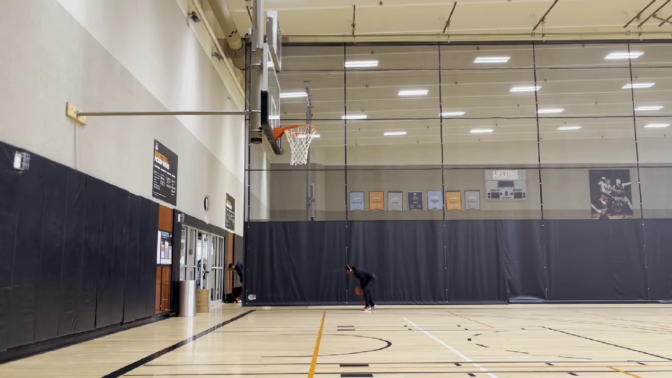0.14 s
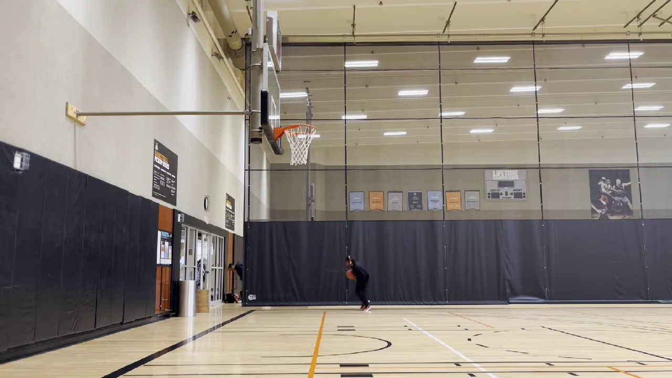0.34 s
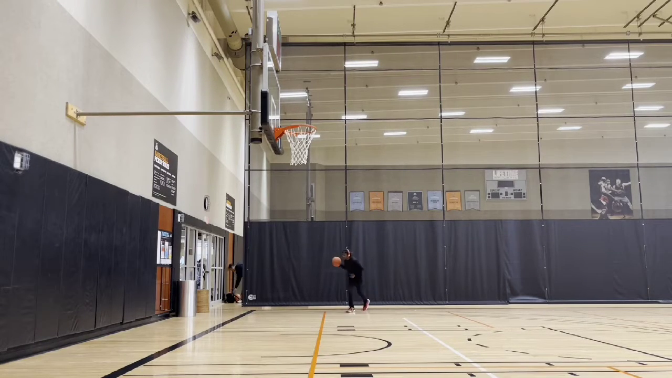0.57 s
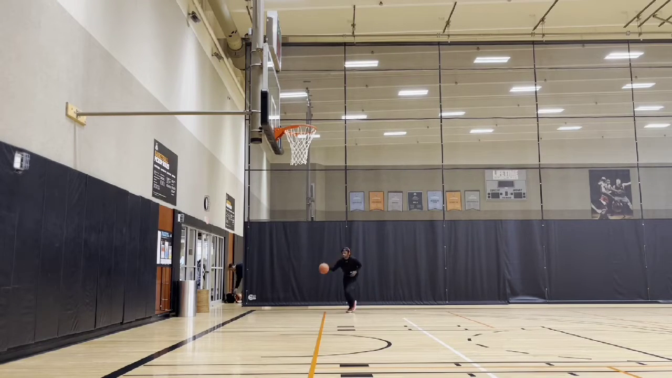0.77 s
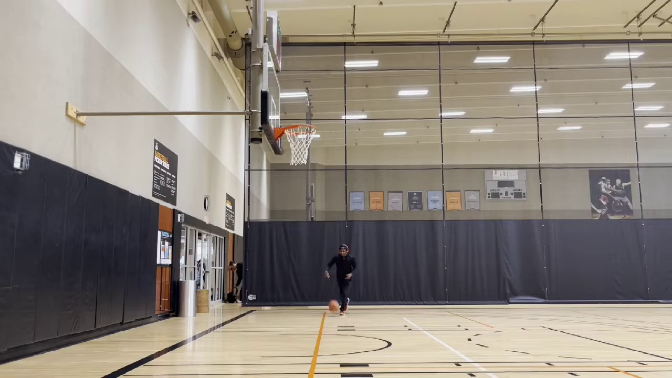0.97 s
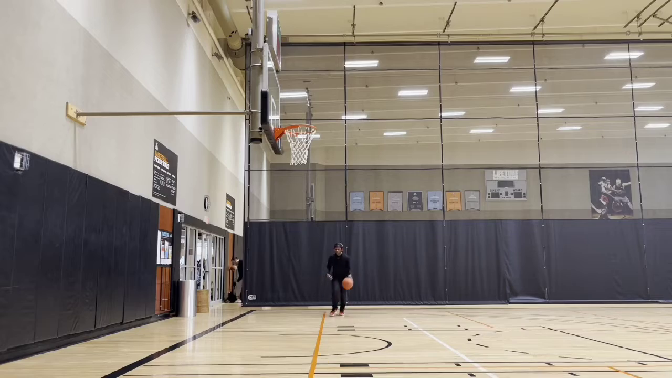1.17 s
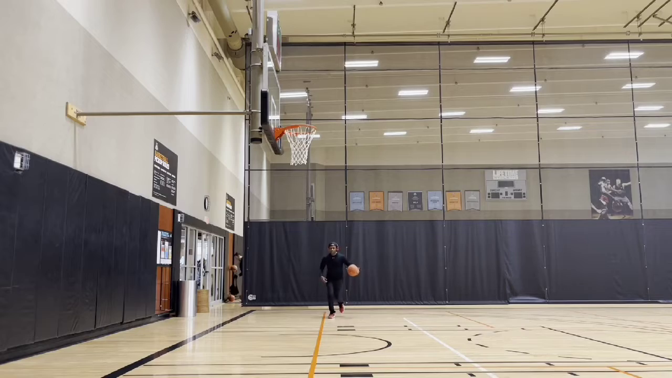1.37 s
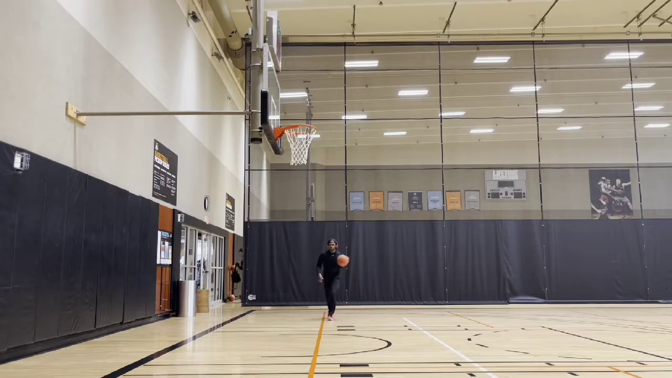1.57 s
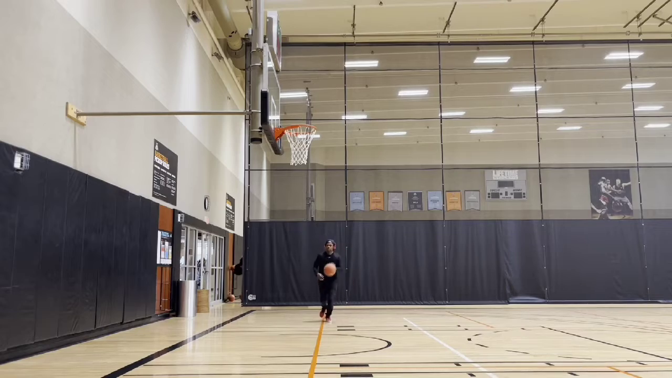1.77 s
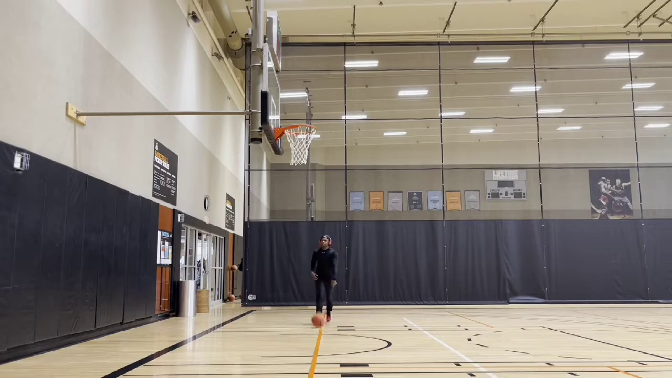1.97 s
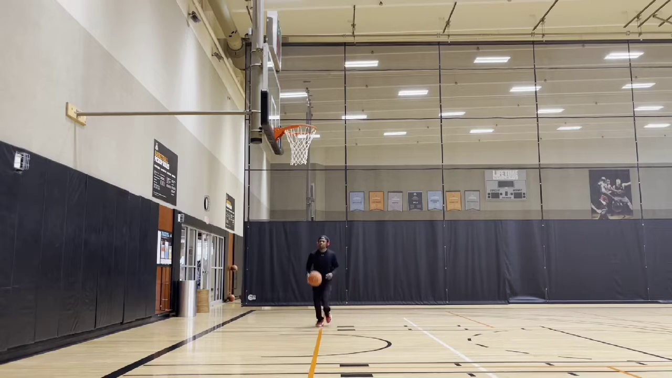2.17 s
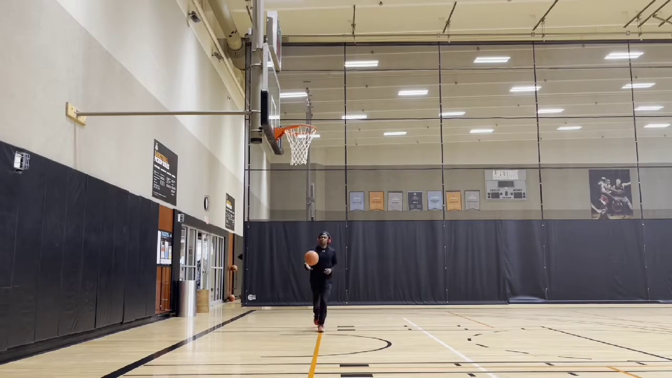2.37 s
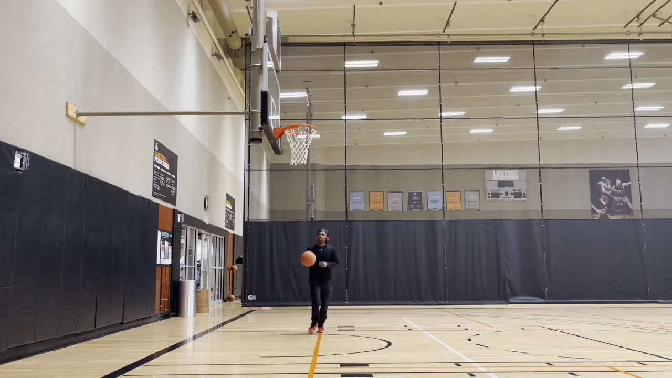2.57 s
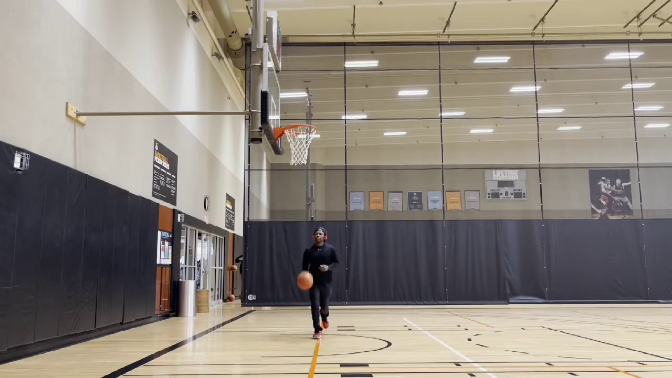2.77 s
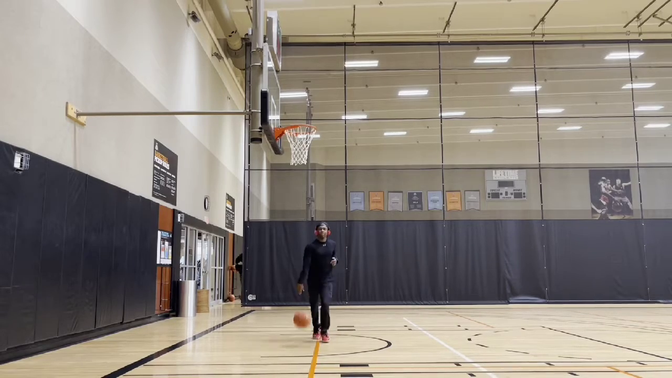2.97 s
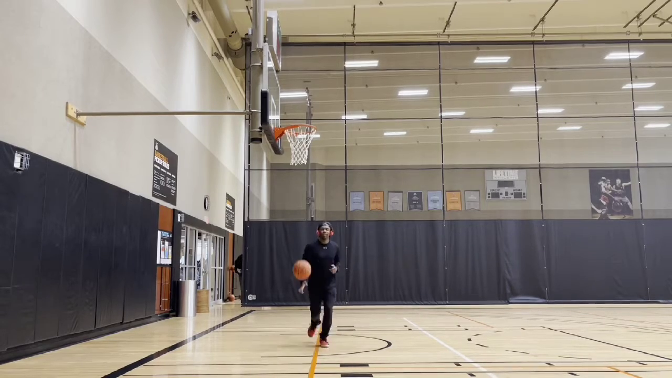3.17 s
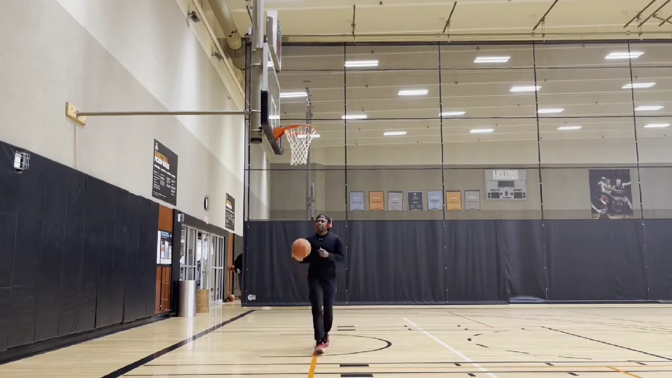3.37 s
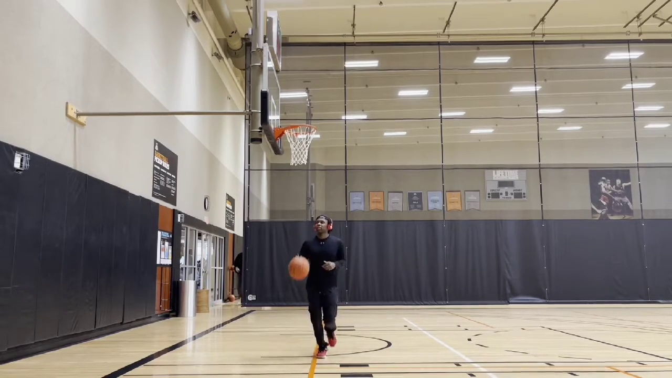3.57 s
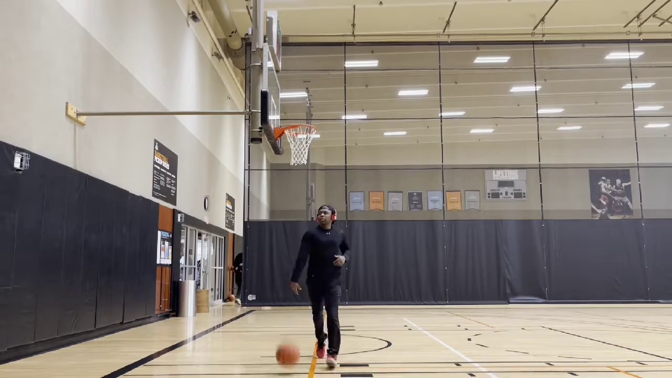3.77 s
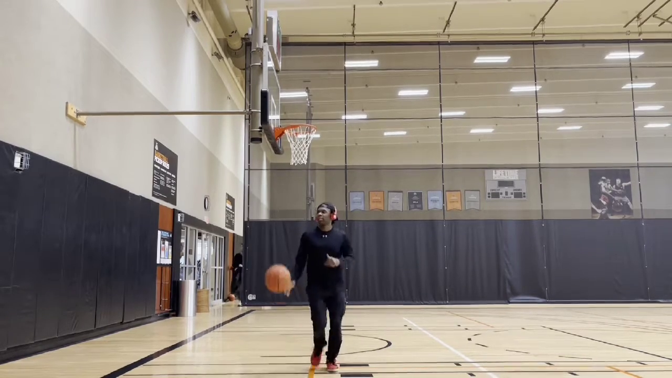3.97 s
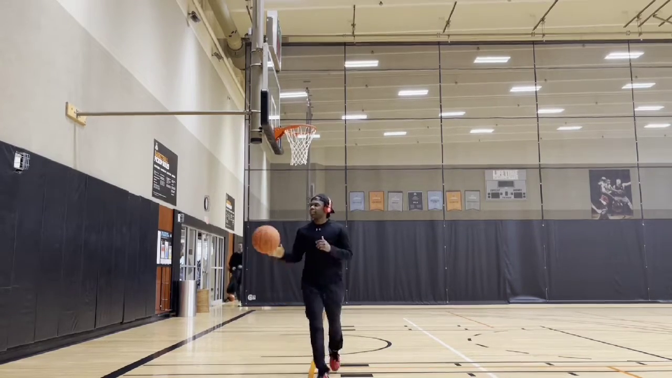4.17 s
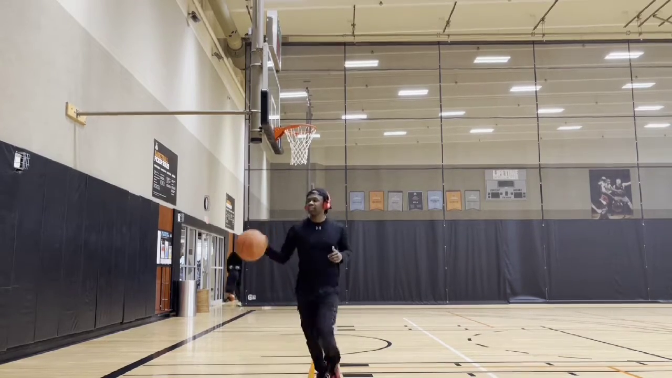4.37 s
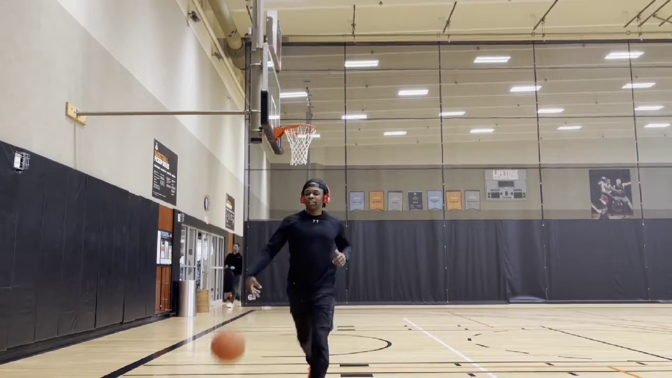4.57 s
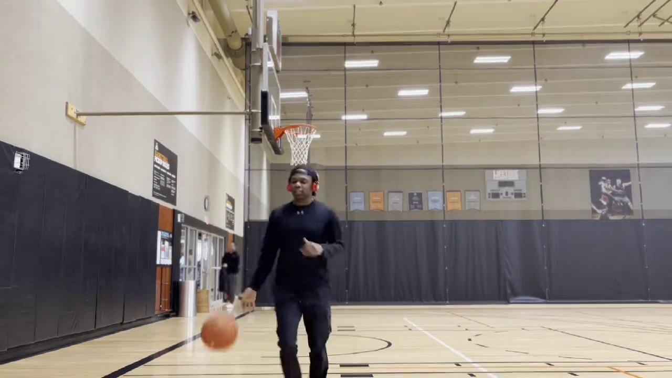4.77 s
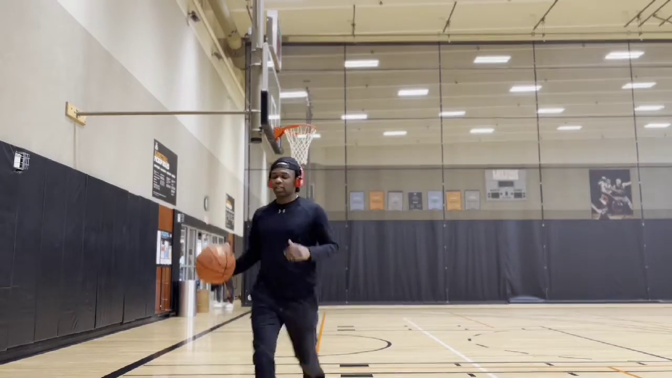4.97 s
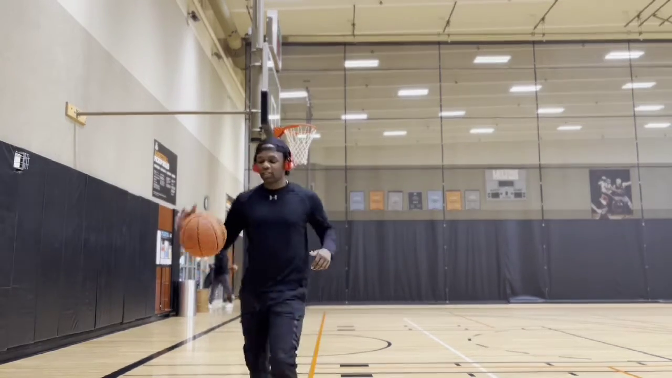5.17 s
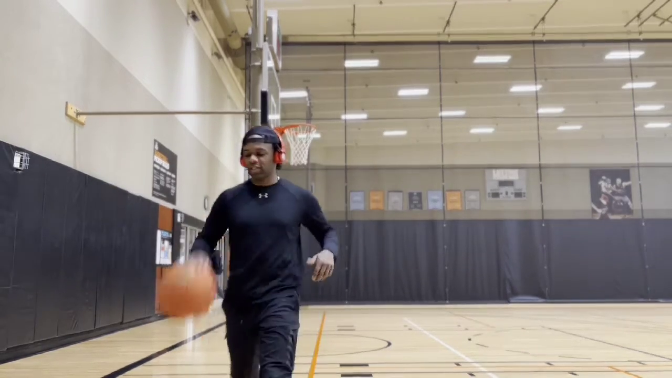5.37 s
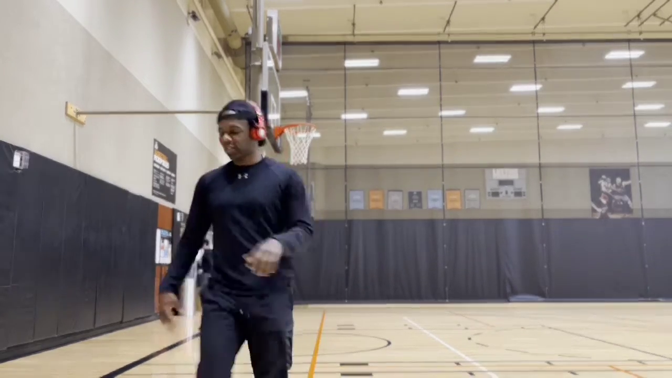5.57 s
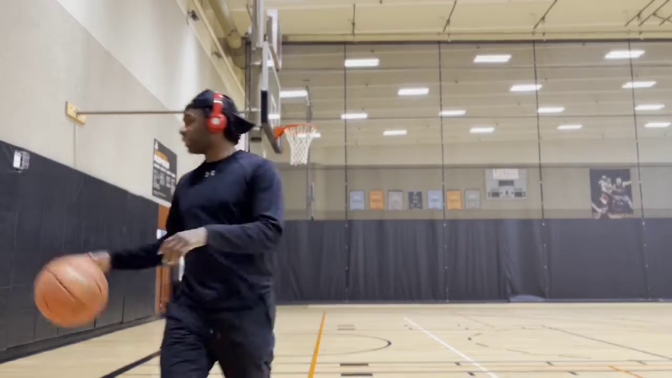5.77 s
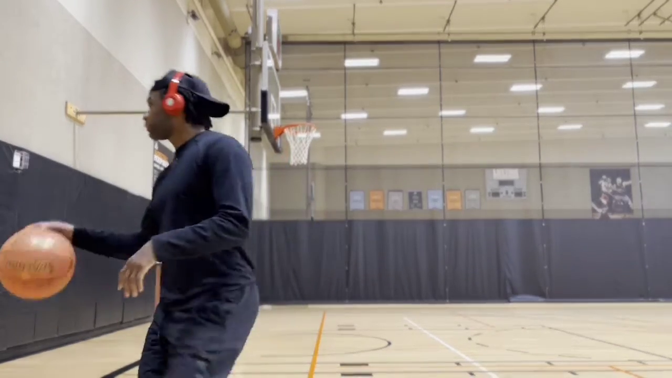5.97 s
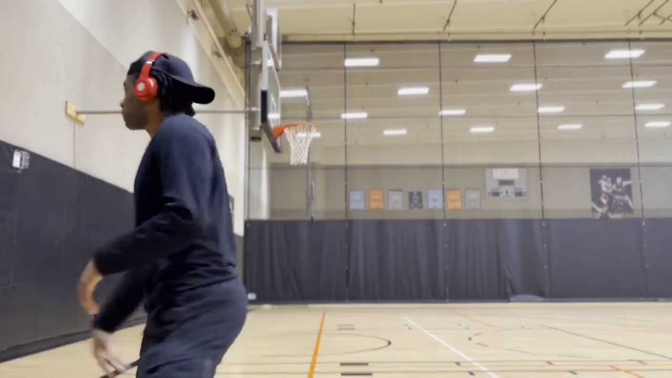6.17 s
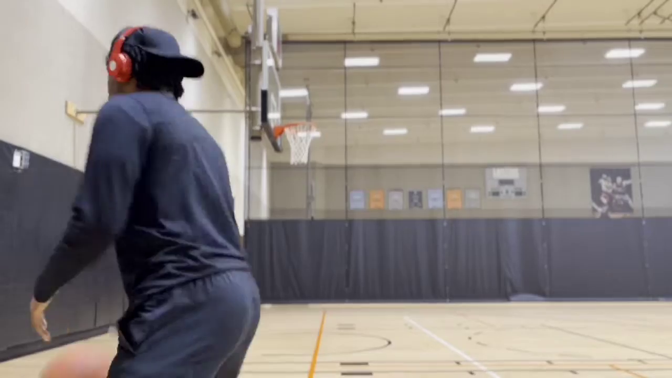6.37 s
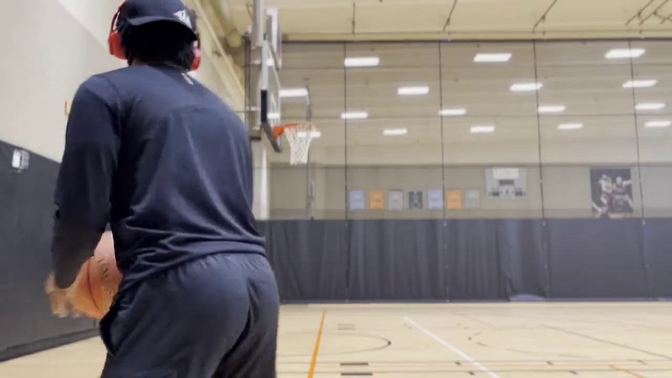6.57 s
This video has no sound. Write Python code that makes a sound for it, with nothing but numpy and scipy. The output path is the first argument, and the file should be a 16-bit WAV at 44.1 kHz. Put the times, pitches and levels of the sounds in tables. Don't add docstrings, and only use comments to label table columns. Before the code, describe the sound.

A basketball bounces slowly on a wooden gym floor, seven slapping, ringing thumps with long hall echoes, coming closer over low ventilation rumble.

```python
import sys
import numpy as np
from scipy import signal
from scipy.io import wavfile
from scipy.ndimage import uniform_filter1d

SR = 44100
rng = np.random.default_rng(int(sys.argv[2]) if len(sys.argv) > 2 else 0)


def voltage_ratio(decibels):
    exponent = np.asarray(decibels, float) / 20
    return 10 ** exponent


def store_wav(level_fs):
    pcm = np.round(np.clip(np.atleast_2d(level_fs), -1, 1) * 32767)
    wavfile.write(sys.argv[1], SR, pcm.T.astype(np.int16))


N = 292463
SHORT_N = 6000


def evened(x):
    return x / np.sqrt(np.mean(x ** 2) + 1e-20)


def peaked(x):
    return x / abs(x).max()


def smooth_noise(count, width):
    return evened(uniform_filter1d(rng.standard_normal(count), width))


def patchy(shape, hz_bins, frames):
    across = uniform_filter1d(rng.standard_normal(shape), hz_bins, 0)
    return evened(uniform_filter1d(across, frames, 1))


def read(points, hz):
    f, value = np.transpose(points)
    return np.interp(np.log(hz + 1), np.log(f + 1), value)


def add(mix, start_s, sound):
    part = mix[round(start_s * SR):][:len(sound)]
    part += sound[:len(part)]


def causal(points):
    hz = abs(np.fft.fftfreq(4096, 1 / SR))
    log_gain = np.log(voltage_ratio(np.maximum(read(points, hz), -100)))
    return np.fft.ifft(np.exp(np.conj(signal.hilbert(log_gain)))).real[:2048]


def ring(t, hz, t60_s, rise_s):
    phase = 2 * np.pi * np.cumsum(hz * np.ones(len(t))) / SR
    return -np.sin(phase) * voltage_ratio(-60 * t / t60_s) * (1 - np.exp(-t / rise_s))


def swell(hz, fall_hz, fall_s, peak_s, late_s, order):
    t = np.maximum(np.arange(SHORT_N) / SR - late_s, 0)
    turns = hz * t + fall_hz * fall_s * (1 - np.exp(-t / fall_s))
    return -np.sin(2 * np.pi * turns) * (t / peak_s * np.exp(1 - t / peak_s)) ** order


# start_s, slap_db, bright_db, ring_db, ring_hz
BOUNCES = [
    (1.1252, -20.5, -23, 0, 1550),
    (2.088, -14.5, -26.5, -6.5, 1470),
    (3.033, -10, -21.5, -6, 1200),
    (3.8641, -12.5, -28.5, -16, 1356),
    (4.7474, -7, -19, -16, 1344),
    (5.631, -12.5, -23, -10.5, 1264),
    (6.322, -10, -18.5, -7, 1613),
]
# time_s, distance_m
WALK = [
    (0, 12),
    (2.2, 12),
    (5.63, 2.9),
    (6.63, 1.9),
]
# time_s, level_db
HALL_STRENGTH = [(1.1, 1), (2.1, 3), (3.0, 4), (3.9, 3), (4.7, 1.5), (5.6, -1), (6.3, -1)]
# pitch_hz, level_db
HALL_COLOUR = [(29, -39), (50, 6), (98, 3), (203, -16.5), (291, -10.5), (371, -26), (601, -23), (783, -32),
               (1470, -29), (1660, -28), (1960, -39.5), (4670, -46), (11100, -64.5), (12900, -83),
               (16000, -59)]
ROOF = (0.06, -.00105, -22.5, -38, .8, -40.5)
FAR_WALL = (0.4, 0.1, -40, -29.5, -0.87, -55)


def dribble():
    out = np.zeros(N)
    for start_s, slap_db, bright_db, ring_db, ring_hz in BOUNCES:
        metres = np.interp(start_s, *np.transpose(WALK))
        strength_db = np.interp(start_s, *np.transpose(HALL_STRENGTH))

        body_db = 6 + 0.64 * ring_db
        skin = slap(bright_db, body_db, ring_hz, sharp=1)
        ball = voltage_ratio(ring_db - 3) * ball_air(ring_hz, rise_s=.003)
        add(out, start_s, voltage_ratio(slap_db + 2) * (skin + ball))

        boards_db = -18.5 + .38 * slap_db - 0.2247 * metres
        settle_hz = 74.4 + 5.05 * metres
        add(out, start_s, voltage_ratio(boards_db + 12.5) * boards(settle_hz))

        hz, colour_db = np.transpose(HALL_COLOUR)
        bloom_db = 4 * np.exp(-(np.log(hz / ring_hz) / .18) ** 2)
        bass_db = (1 - 0.34 * metres) * (hz < 150)
        treble_db = (4.5 - .28 * metres) * (hz > 1900)
        colour = np.transpose([hz, colour_db + bass_db + treble_db + bloom_db])
        stretch = 0.82 + 0.031 * metres
        add(out, start_s + .008, voltage_ratio(-28 + strength_db) * hall(colour, stretch, gather_s=.015))

        for surface in (ROOF, FAR_WALL):
            add(out, *echo(start_s, metres, *surface))
    return out


# pitch_hz, level_db
SLAP_COLOUR = [(350, -42.5), (600, -6), (1000, -8), (1800, -11.5), (2400, -12), (4700, -7), (6250, -15),
               (10600, -18), (12600, -16), (14500, -20), (16000, -12.5)]


def slap(bright_db, body_db, ring_hz, sharp):
    t = np.arange(SHORT_N) / SR
    clumps = voltage_ratio(4 * smooth_noise(len(t), 70))
    envelope = .05 * voltage_ratio(-60 * t / .009) + .045 * clumps * voltage_ratio(-60 * t / .065)
    crackle = rng.standard_normal(len(t)) * envelope
    crackle[:34] *= .4
    crackle[[34, 100, 320, 560]] -= sharp * np.array([1, .15, .3, .22])

    hz = np.geomspace(300, 17000, 80)
    tilt_db = (bright_db + 12.5) * np.clip(np.log2(hz / 3000), 0, 1)
    tilt_db += (bright_db + 23.5) * 0.53 * np.clip(np.log2(hz / 9000), 0, 1)
    ring_db = 9 * np.exp(-(np.log(hz / ring_hz) / .25) ** 2)
    low_db = body_db * np.clip(np.log2(1600 / hz), 0, 1)
    colour = np.transpose([hz, read(SLAP_COLOUR, hz) + tilt_db + ring_db + low_db])
    return peaked(signal.fftconvolve(crackle, causal(colour))[:len(t)])


# ratio to ring centre, level_db, t60_s
BALL_MODES = [(.74, -8, .04), (.93, -4, .04), (1, 0, .045), (1.09, -4, .04), (1.28, -10, .035),
              (1.62, -12, .03)]


def ball_air(centre_hz, rise_s):
    t = np.arange(SHORT_N) / SR
    out = np.zeros(len(t))
    for ratio, level_db, t60_s in BALL_MODES:
        mode_hz = centre_hz * ratio * rng.uniform(0.99, 1.03)
        out += voltage_ratio(level_db) * ring(t, mode_hz, t60_s, rise_s)
    return out


def boards(hz):
    knock = swell(283 - .15 * hz, 8, .004, .0055, .0015, order=2)
    thump = swell(hz, 232 - hz, .43 / hz, 1.19 / hz, .0042, order=2)
    rattle = swell(483, 0, 1, 0.0054, 0.00377, order=2)
    return voltage_ratio(-2.5) * knock + thump + voltage_ratio(-16.5) * rattle


def echo(bounce_s, metres, delay_s, delay_s_per_m, ring_db, knock_db, knock_db_per_m, click_db):
    ball = voltage_ratio(ring_db - 6) * ball_air(1400, rise_s=.006)
    click = voltage_ratio(click_db + 5) * slap(-30, 3, 1400, sharp=.12)
    knock = voltage_ratio(knock_db + knock_db_per_m * metres + 1) * swell(251, 0, 1, 0.0037, 0, order=1)
    return bounce_s + delay_s + delay_s_per_m * metres, ball + click + knock


# pitch_hz, t60_s
HALL_T60 = [(60, 2.5), (150, 3.14), (400, 3.37), (1200, 4.04), (3000, 3.05), (6000, 0.9), (11000, 0.61)]


def hall(colour, stretch, gather_s):
    grid = dict(nperseg=512, noverlap=384)
    hz, t, z = signal.stft(rng.standard_normal(2 * SR), SR, **grid)
    lumps_db = patchy(z.shape, 8, 5) * (1.2 + 2.5 * np.exp(-t / .15))
    z = z * voltage_ratio(read(colour, hz)[:, None] + lumps_db)
    lumpy = signal.istft(z, SR, **grid)[1]

    hz, t, z = signal.stft(lumpy, SR, **grid)
    early_db = 5 * (hz > 230) + 5 * (abs(hz - 650) < 350)
    early_db = early_db[:, None] * np.exp(-(t / 0.041) ** 2)
    decay_db = -60 * t / (stretch * read(HALL_T60, hz)[:, None])
    tail = signal.istft(z * voltage_ratio(early_db + decay_db), SR, **grid)[1]
    t = np.arange(len(tail)) / SR
    return voltage_ratio(22) * tail * (1 - np.exp(-t / gather_s))


# start_s, level_db, pitch_hz
BOOMS = [(1.215, -31, 103), (1.33, -24, 72.7), (1.39, -22.5, 83), (2.229, -19, 102), (2.459, -19.5, 96),
         (2.646, -26.5, 152), (3.085, -23, 96.5), (3.216, -23, 91), (3.288, -24, 70.6), (3.959, -20.5, 90),
         (4.577, -23.5, 73), (4.84, -27, 84), (4.926, -22.5, 86.5), (5.834, -20, 88.8), (6.006, -26.5, 76),
         (6.38, -16, 102.4), (6.535, -17.5, 96)]


def booms():
    out = np.zeros(N)
    for start_s, level_db, pitch_hz in BOOMS:
        add(out, start_s, voltage_ratio(level_db - 3.5) * swell(pitch_hz, 28, 0.0094, 1.35 / pitch_hz, 0, order=2))
    return out


# start_s, level_db, pitch_hz
PATS = [
    (0.52, -44.5, 545),
    (0.709, -45.5, 540),
    (1.442, -36.5, 555),
]


def pats():
    out, t = np.zeros(N), np.arange(SHORT_N) / SR
    dull = causal([(300, -19), (500, -4), (1200, -5), (3000, -22), (8000, -50)])
    for start_s, level_db, pitch_hz in PATS:
        puff = signal.fftconvolve(rng.standard_normal(len(t)) * voltage_ratio(-60 * t / 0.23), dull)
        hollow = ring(t, pitch_hz, t60_s=0.067, rise_s=0.0018)
        add(out, start_s, voltage_ratio(level_db) * (hollow + 0.57 * peaked(puff)[:len(t)]))
    return out


# start_s, level_db, pitch_hz
TAPS = [(1.049, -55, 4300), (1.076, -53, 7200), (1.442, -30, 3220), (1.4475, -32, 3700),
        (1.4535, -35, 4200), (1.48, -40, 2930), (2.779, -47, 4050), (3.48, -51, 8500), (4.585, -31.5, 4540),
        (4.925, -34, 4370), (4.971, -42, 7840), (5.337, -27, 4240), (5.35, -46, 9000), (5.365, -46, 5500),
        (5.381, -39, 8500), (5.645, -30, 4900), (5.735, -43, 8900), (5.771, -35, 4500), (5.817, -44, 10500),
        (6.418, -48, 9500), (6.443, -51, 6000)]
# start_s, level_db, pitch_hz
SCUFFS = [(.381, -55, 4170), (.705, -52, 3280), (.731, -56, 3000), (.8, -58, 4750), (2.937, -55, 5160),
          (4.735, -41, 5200), (4.906, -35.5, 3480), (5.751, -35, 4120), (6.314, -48, 5600),
          (6.431, -32.5, 4300)]


def ticks():
    out, t = np.zeros(N), np.arange(SHORT_N) / SR
    for table, t60_s in ((TAPS, 0.015), (SCUFFS, 0.11)):
        for start_s, level_db, hz in table:
            colour = causal([(hz / 3, -36), (hz / 1.3, -3), (hz * 1.25, -3), (hz * 2.2, -36)])
            envelope = voltage_ratio(-60 * t / t60_s) * (1 - np.exp(-t / 0.00033))
            burst = rng.standard_normal(len(t)) * envelope
            add(out, start_s, voltage_ratio(level_db - 7) * peaked(signal.fftconvolve(burst, colour)))
    return out


# start_s, length_s, pitch_hz, level_db
SQUEAK = (4.41, .12, 4450, -66)


def squeak():
    out = np.zeros(N)
    start_s, length_s, pitch_hz, level_db = SQUEAK
    u = np.arange(round(length_s * SR))
    waver = 1 + .03 * smooth_noise(len(u), 80)
    tone = np.sin(2 * np.pi * np.cumsum(pitch_hz * waver) / SR)
    add(out, start_s, voltage_ratio(level_db) * tone * np.sin(np.pi * u / len(u)))
    return out


# pitch_hz, level_db
CLOTH_COLOUR = [(2000, -31), (4500, 1), (7000, -0.5), (10000, 1), (14500, 2.5), (16000, 1.5)]
# start_s, level_db, length_s
RUSTLES = [(.075, -77, .12), (.384, -79, .073), (1.3794, -73, .08), (2.436, -68.5, .1), (2.5294, -75, .066),
           (2.5994, -77, .08), (2.774, -68, .094), (3.134, -64.5, 0.13), (3.476, -59.5, .085),
           (4.201, -60.5, .093), (5.342, -54.5, 0.078), (5.795, -61.5, 0.092), (5.886, -66, .08),
           (6.198, -70.5, 0.16), (6.268, -65, .034), (6.365, -66, .071)]
# start_s, level_db, length_s
RUBS = [(.511, -72, .053), (.693, -79, .073), (.805, -73, .056), (1.056, -69, .2), (1.729, -67.5, .056),
        (2.923, -68, 0.13), (3.667, -69, .08), (4.33, -72, .11), (4.405, -69, .2), (4.574, -59, .096),
        (4.672, -68, .057), (4.798, -55, .062), (4.903, -57.5, 0.15), (4.945, -55.5, .12),
        (5.021, -63.5, 0.18), (5.667, -54, .02), (5.722, -56, .11), (6.414, -56, 0.065)]


def swishes():
    out = np.zeros(N)
    hz, base_db = np.transpose(CLOTH_COLOUR)
    for table, mid_lift_db in ((RUSTLES, 7.5), (RUBS, 15)):
        colour = causal(np.transpose([hz, base_db + mid_lift_db * (hz < 6000)]))
        for start_s, level_db, length_s in table:
            u = np.arange(16000) / SR / np.clip(length_s, .02, .2)
            grains = rng.standard_normal(len(u)) * voltage_ratio(3 * smooth_noise(len(u), 200))
            hiss = evened(signal.fftconvolve(grains, colour)[:len(u)])
            rise = 1 - np.exp(-u / 0.21) ** 1.8
            fall = np.exp(-(1.2 * u) ** 2) + .15 * np.exp(-u / 4.5)
            add(out, start_s, voltage_ratio(level_db - 1.5) * hiss * peaked(rise * fall))
    return out


# pitch_hz, level_db
AIR_COLOUR = [(22, -31), (37, -5), (60, 0.5), (101, -6.5), (163, -18), (248, -23.5), (410, -33), (560, -32),
              (780, -36), (1650, -41), (1950, -51), (5000, -58.5), (6300, -69), (16000, -76)]


def ventilation():
    frames, hz = N // 512 + 5, np.fft.rfftfreq(2048, 1 / SR)
    shape = (len(hz), frames)
    noise = rng.standard_normal(shape) + 1j * rng.standard_normal(shape)
    z = noise * voltage_ratio(read(AIR_COLOUR, hz)[:, None] + 1.4 * patchy(shape, 14, 8))
    return voltage_ratio(-40) * evened(signal.istft(z, nperseg=2048, noverlap=1536)[1][:N])


def scene():
    mix = dribble() + booms() + pats() + ticks() + squeak() + swishes() + ventilation()
    return mix[None]


def low_pass(x):
    return signal.sosfilt(signal.butter(12, 17130, fs=SR, output="sos"), x)


# pitch_hz, level_db
PORT = [(10500, 0.5), (12000, -8.5), (12800, -30), (13600, -4), (14500, -14.5), (15800, -1.5), (16050, -28),
        (16600, -34.5), (17000, -62.5)]


def record(dry):
    low_cut = signal.butter(3, 33, "high", fs=SR, output="sos")
    dry = signal.sosfiltfilt(low_cut, dry)
    finished = signal.oaconvolve(dry, causal(PORT)[None])[:, :N]
    return low_pass(finished)


dry = scene()
out = record(dry)
store_wav(out)
```